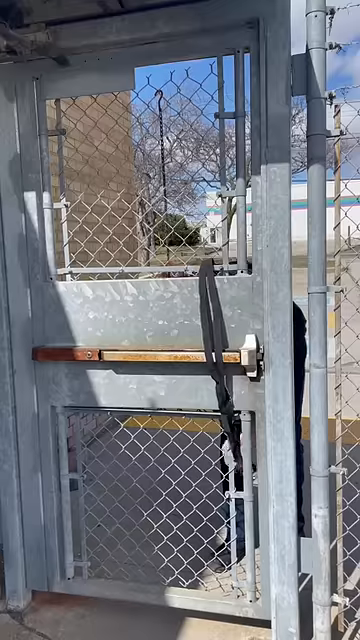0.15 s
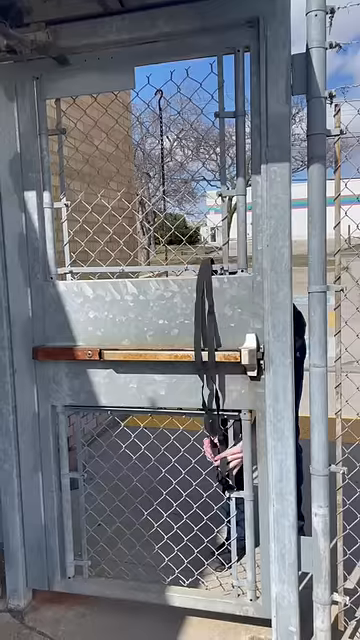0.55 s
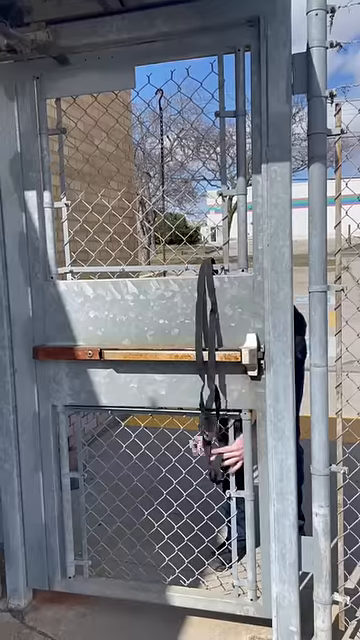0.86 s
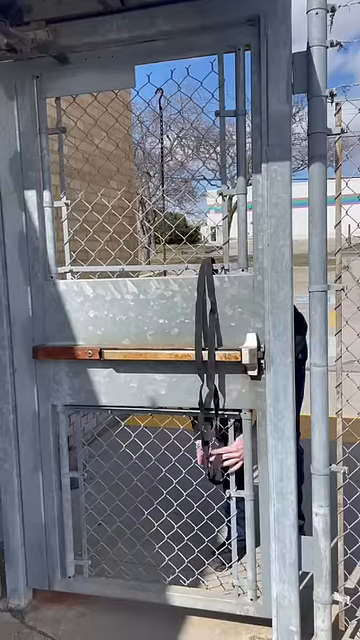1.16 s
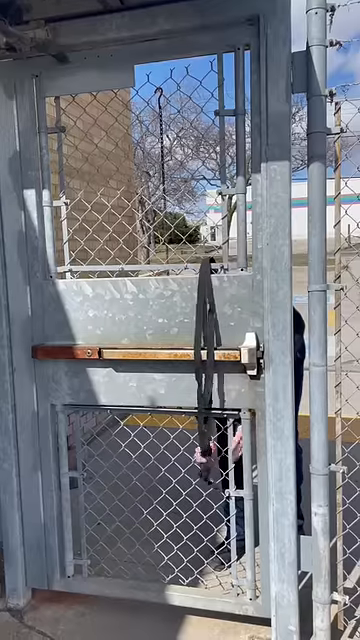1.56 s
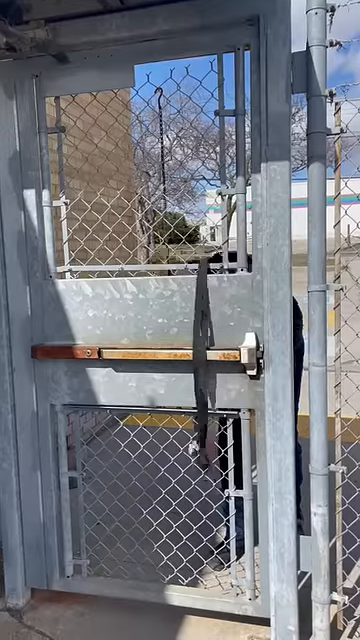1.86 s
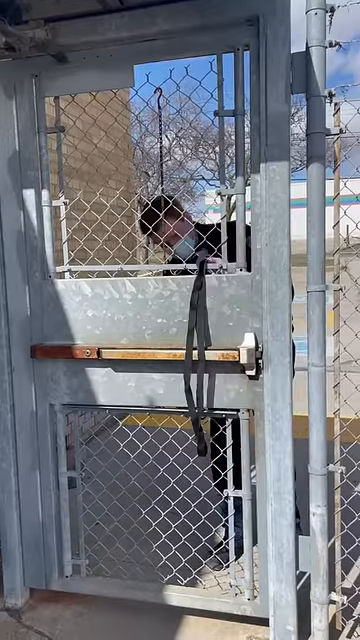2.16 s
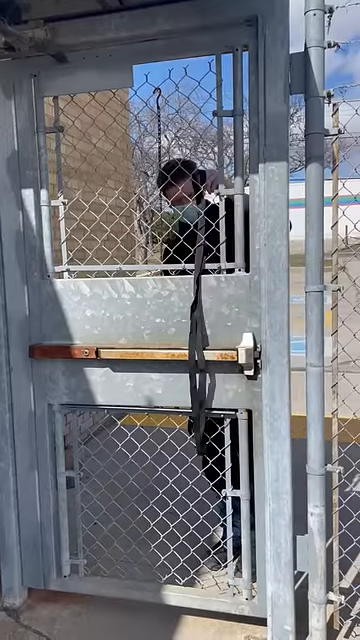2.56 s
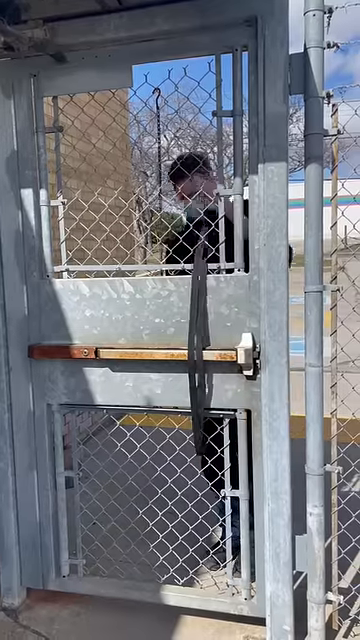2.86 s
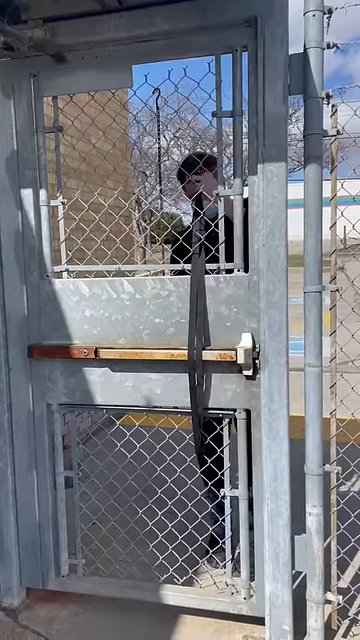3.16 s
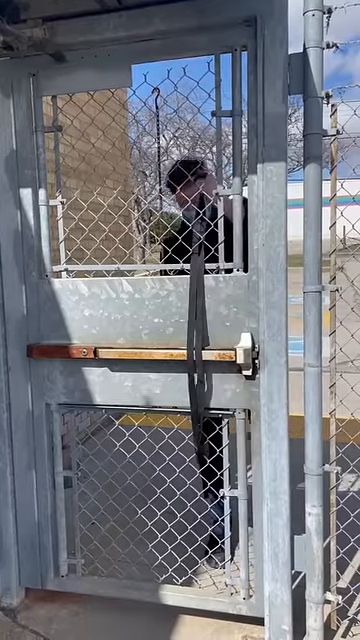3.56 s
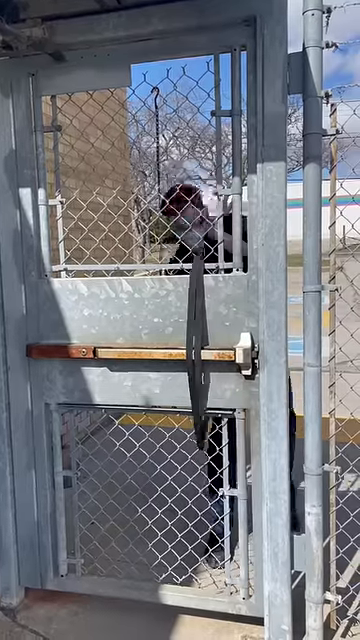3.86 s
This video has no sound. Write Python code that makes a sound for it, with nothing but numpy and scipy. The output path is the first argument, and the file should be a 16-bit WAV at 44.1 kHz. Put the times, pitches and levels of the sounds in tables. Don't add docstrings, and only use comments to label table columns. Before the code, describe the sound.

A strap rustles faintly on a steel mesh gate with small ticks and wire jingles, then the push bar knocks and the latch clanks and rattles. Outdoors, close stereo microphone buffeted by wind, far traffic hum.

```python
import sys
import numpy as np
from scipy import signal
from scipy.fft import rfft, irfft
from scipy.io import wavfile

SR = 44100
rng = np.random.default_rng(int(sys.argv[2]) if len(sys.argv) > 2 else 0)


def level_to_linear(level):
    exponent = np.asarray(level, float) / 20
    return 10 ** exponent


def pcm_store(signal):
    levels = np.round(np.clip(np.atleast_2d(signal), -1, 1) * 32767)
    wavfile.write(sys.argv[1], SR, levels.astype(np.int16).T)


N = 176400
BRIGHT_HZ = 4840


def rms_one(x):
    return x / np.sqrt(np.mean(x ** 2) + 1e-20)


def in_time(rows, off_db=-120):
    s, db, *rest = np.transpose(rows)
    t = np.arange(N) / SR
    outside = (t < s[0]) | (t > s[-1] + .004)
    level = np.where(outside, off_db, np.interp(t, s, db))
    return [level] + [np.interp(t, s, column) for column in rest]


def colour(x, points):
    below = (points[0][0] / 3, points[0][1] - 30)
    above = (points[-1][0] * 2, points[-1][1] - 40)
    hz, db = np.transpose([below] + list(points) + [above])
    f = np.arange(N // 2 + 1) * SR / N + 1
    return irfft(rfft(x) * level_to_linear(np.interp(np.log(f), np.log(hz), db)), N)


def cut(x, hz, kind, order=1):
    return signal.sosfilt(signal.butter(order, hz, kind, fs=SR, output="sos"), x)


def drift(rate_hz, rows=1):
    r = np.exp(-2 * np.pi * rate_hz / SR)
    noise = rng.standard_normal((rows, N + SR))
    return rms_one(signal.lfilter([1], [1, -2 * r, r * r], noise)[:, SR:])


def resonate(x, peaks):
    out = 0
    for k, (hz, width, db) in enumerate(peaks):
        r = np.exp(-np.pi * max(width, 5) / SR)
        poles = [1, -2 * r * np.cos(2 * np.pi * hz / SR), r * r]
        out = out + (-1) ** k * level_to_linear(db) * signal.lfilter([1 - r, 0, r - 1], poles, x)
    return out


def grains(per_s, spread):
    size = 10 ** (spread * np.minimum(rng.exponential(1, N), 4) / 20)
    size = size * rng.choice([-1, 1], N)
    return rms_one(size * (rng.random(N) < per_s / SR))


def patchy(x, depth_db):
    octave = np.log2(np.arange(N // 2 + 1) * SR / N / 30 + 1)
    spectrum = rfft(x)
    out = 0
    for k, waver in enumerate(drift(9, rows=11)):
        band = np.clip(1 - abs(octave - k), 0, 1)
        out = out + level_to_linear(depth_db * waver) * irfft(spectrum * band, N)
    return out


# (time [s], level [dB], brightness [dB])
RUB = [(0, -62, -4.5), (0.301, -70, 12.5), (.52, -61, -2), (.7, -65, -7), (.93, -70, -14), (.98, -55, -7.5),
       (1.14, -65, -27), (1.32, -75, 4.5), (1.37, -69, 10.5), (1.55, -56, 1), (1.72, -56.5, -2),
       (1.85, -50.5, -9), (2.1, -58, -15), (2.52, -55, -1), (2.8, -58, -6), (3.1, -55.5, -11),
       (3.2, -66, 1.5), (3.6, -62.5, 3)]
# (pitch [Hz], level [dB per Hz])
FIBRES = [(300, 14), (900, 5.5), (2600, 4), (4200, -1), (5100, 2.5), (7500, 1), (12000, -16.5),
          (15600, -15)]
# (pitch [Hz], width [Hz], level [dB])
MESH = [(2075, 90, 0), (2380, 90, -3), (3060, 90, -2), (3600, 100, -2)]
RUB_DB, RUB_PER_S, RUB_SPREAD, RUB_PATCH_DB = 4.5, 8000, 1, 2.2
MESH_DB, FLUTTER_DB, FLUTTER_HZ = -22, 1.6, 8


def strap():
    rub = grains(RUB_PER_S, RUB_SPREAD)
    level, bright = in_time(RUB + [(4.5, *RUB[-1][1:])])
    wires = 0
    for wire, waver in zip(MESH, drift(6, len(MESH))):
        wires = wires + level_to_linear(6 * waver) * resonate(rub, [wire])
    hiss = rms_one(patchy(colour(rub, FIBRES), RUB_PATCH_DB)) + level_to_linear(MESH_DB) * rms_one(wires)
    top = cut(hiss, BRIGHT_HZ, "high")
    top_gain = level_to_linear(bright + FLUTTER_DB * drift(FLUTTER_HZ)[0])
    return (hiss + (top_gain - 1) * top) * level_to_linear(level + RUB_DB)


# (time [s], peak [dB], pitch [Hz])
TICKS = [(0.174, -44, 900), (0.5077, -46.5, 716), (0.9492, -51, 960), (1.8128, -46, 1120),
         (2.0444, -50, 757), (2.6738, -38.5, 704), (2.7267, -41.5, 900), (3.0051, -47.5, 790),
         (3.0584, -40, 1320), (3.6311, -34.5, 710), (3.8307, -19, 780)]
TICK_CRACK_DB, TICK_RING_DB, TICK_ATTACK_S, TICK_T60_S = -3.5, -12.5, 0.00089, 0.11


def ticks():
    out, t = np.zeros(N + SR), np.arange(SR // 2) / SR
    crack = rms_one(colour(rng.standard_normal(N), FIBRES))
    shape = level_to_linear(-60 * t / TICK_T60_S) * (1 - np.exp(-t / TICK_ATTACK_S))
    for s, db, hz in TICKS:
        i = int(s * SR)
        ring = level_to_linear(TICK_RING_DB) * np.sin(2 * np.pi * hz * t)
        out[i:i + len(t)] += level_to_linear(db) * shape * (level_to_linear(TICK_CRACK_DB) * np.resize(crack[i:], len(t)) + ring)
    return out[:N]


# (time [s], peak [dB])
SNAPS = [(.08, -59), (.176, -41.5), (.3701, -58), (0.4213, -58), (.951, -58), (2.677, -39.5), (3.059, -34),
         (3.247, -54), (3.299, -53), (3.455, -46), (3.534, -53), (3.558, -53), (3.608, -45), (3.632, -46),
         (3.831, -16.5)]
SNAP_T60_S = .007


def snaps():
    out, t = np.zeros(N + SR), np.arange(SR // 2) / SR
    for s, db in SNAPS:
        i = int(s * SR)
        out[i:i + len(t)] += level_to_linear(np.maximum(db - 60 * t / SNAP_T60_S, -200)) * rng.standard_normal(len(t))
    return out[:N]


# (time [s], level [dB], time to die by 60 dB [s])
JINGLES = [
    (2.493, -45.5, 0.062),
    (2.76, -64, 0.12),
    (3.077, -39, 0.18),
    (3.46, -60, 0.1),
]
# (pitch [Hz], width [Hz, not used], level [dB])
WIRE = [(6830, 23, -4), (7600, 30, 2), (9370, 24, -10), (10470, 63, -13.5), (12300, 29, -29),
        (13100, 40, -15), (15500, 58, 7)]
JINGLE_ROUGH, JINGLE_HISS_DB, JINGLE_ATTACK_S = .7, -7, 0.0035


def jingles():
    out, t = np.zeros(N + SR), np.arange(SR // 2) / SR
    shake = drift(64, len(WIRE))
    hiss = np.diff(rng.standard_normal(N + 1))
    balance = rng.normal(0, 5.3, (len(JINGLES), len(WIRE)))
    for (s, db, t60), luck in zip(JINGLES, balance):
        now = slice(int(s * SR), int(s * SR) + len(t))
        shape = level_to_linear(db - 60 * t / t60) * (1 - np.exp(-t / JINGLE_ATTACK_S))
        sound = level_to_linear(JINGLE_HISS_DB) * hiss[now]
        for (hz, _, wire_db), extra_db, waver in zip(WIRE, luck, shake):
            rough = 1 + JINGLE_ROUGH * waver[now]
            sound = sound + level_to_linear(wire_db + extra_db) * rough * np.sin(2 * np.pi * hz * t)
        out[now] += shape * sound
    return out[:N]


# (pitch [Hz], level [dB per Hz])
STEEL = [(120, 3.5), (400, 8), (1000, 1), (2500, -2), (5200, -9), (7500, -11.5), (11000, -22), (16000, -29)]
KNOCKS_PER_S, KNOCK_SPREAD, RING_DB, SPLIT_HZ = 6000, 2.9, -2, 800


def steel(effort, peaks):
    level, heavy, bright = in_time(effort)
    knocks = grains(KNOCKS_PER_S, KNOCK_SPREAD)
    low = rms_one(cut(knocks, SPLIT_HZ, "low"))
    high = rms_one(cut(knocks, SPLIT_HZ, "high"))
    top = cut(high, BRIGHT_HZ, "high")
    ring_gain = level_to_linear(RING_DB) * np.std(colour(high, STEEL)) / np.std(resonate(high, peaks))

    def body(x):
        return colour(x, STEEL) + ring_gain * resonate(x, peaks)

    low_drive = level_to_linear(heavy) * low / np.std(body(low))
    high_drive = (high + (level_to_linear(bright) - 1) * top) / np.std(body(high))
    return body(level_to_linear(level) * (low_drive + high_drive))


# (time [s], level [dB], heaviness [dB], brightness [dB])
DRAG = [
    (3.628, -62, -1, 27),
    (3.634, -38, 4, -12),
    (3.664, -41, 7.5, -8),
    (3.684, -51.5, 17, 7),
    (3.76, -47.5, 11, 7.5),
    (3.79, -51, 8, 20),
    (3.822, -41.5, 3.5, -2),
]
# (pitch [Hz], width [Hz], level [dB])
BAR = [(330, 180, 0), (610, 130, 4), (900, 210, -8), (2150, 500, -0.5)]


def bar_drag():
    return steel(DRAG, BAR)


# (time [s], level [dB], heaviness [dB], brightness [dB])
CLANK = [
    (3.828, -35.5, 3, 5),
    (3.854, -16.5, -12, 3.5),
    (3.874, -20, -4.5, 2),
    (3.9, -27.5, -0.5, -11),
    (3.912, -21.5, -8.5, 9),
    (3.928, -24, 0.5, 1),
    (3.942, -22, -10, 12),
    (3.965, -24.5, -23, 1.5),
    (4, -31.5, 4.5, -12),
]
# (pitch [Hz], width [Hz], level [dB])
GATE = [(277, 110, 3.5), (500, 170, 1), (2030, 1900, -8), (3700, 740, 5), (5490, 1400, -3)]


def latch_clank():
    return steel(CLANK, GATE)


# (time [s], pitch [Hz], peak [dB], time to die by 60 dB [s])
RINGS = [(1.615, 3570, -51, 0.19), (1.805, 1160, -45.5, 0.13), (2.03, 4580, -64, 0.27),
         (2.15, 4580, -60, .3), (2.43, 5200, -61, .25), (2.45, 4580, -63, 0.24), (2.03, 4580, -62, 0.25),
         (2.15, 4580, -60, 0.25), (2.43, 5200, -64, 0.22), (2.45, 4580, -61, .3), (3.632, 2110, -37, 0.23),
         (3.634, 638, -27.5, 0.18), (3.655, 383, -35, 0.18), (3.64, 900, -36, .2), (3.632, 1142, -43, 0.14),
         (3.845, 290, -25, .25), (3.848, 471, -19, 0.14), (3.858, 531, -18, 0.16),
         (3.872, 259, -23.5, 0.22), (3.845, 1429, -26, .15), (3.845, 1800, -23, 0.17),
         (3.845, 2030, -25, 0.22), (3.847, 4130, -24, .15), (3.847, 5230, -39, .2), (3.884, 1200, -22, 0.2),
         (3.905, 6210, -20.5, 0.23), (3.91, 736, -25, 0.32), (3.93, 1330, -27.5, 0.66),
         (3.955, 1410, -34, .5), (3.932, 5330, -18.5, 0.145), (3.934, 4940, -21.5, 0.13),
         (3.94, 2070, -32, .25), (3.945, 3620, -18, 0.12), (3.935, 3170, -25, 0.13),
         (3.937, 4300, -31, 0.1), (3.935, 3170, -25, 0.11), (3.937, 4300, -32, .15), (3.94, 657, -26.5, .4)]
RING_RISE_S, RING_ROUGH, RING_WOBBLE_HZ = .004, .8, 70


def rings():
    out, t = np.zeros(N + SR), np.arange(SR // 2) / SR
    wobble = drift(RING_WOBBLE_HZ)[0]
    for k, (s, hz, db, t60) in enumerate(RINGS):
        i = int(s * SR)
        shape = level_to_linear(db - 60 * t / t60) * (1 - np.exp(-t / RING_RISE_S))
        rough = 1 + RING_ROUGH * wobble[k * 4000:][:len(t)]
        out[i:i + len(t)] += level_to_linear(-1.5) * shape * rough * np.sin(2 * np.pi * hz * t)
    return out[:N]


# (pitch [Hz], phase [radians])
LEAD = [(0, 0), (1720, 1.5), (3100, 1.7), (5000, .7), (7000, 2.9), (8600, 3.4), (9900, 6.0), (12300, 6.5),
        (13200, 9.3), (15100, 9.6), (15700, 11.2), (16500, 10)]
# (pitch [Hz], level [dB])
SCATTER = [(100, -20), (400, -13), (1300, -3), (2400, 0), (5000, -6), (6800, -18), (16000, -22)]
SCATTER_T60_S = .06


def ports(x):
    f = np.arange(N // 2 + 1) * SR / N
    turn = np.exp(.5j * np.interp(f, *np.transpose(LEAD)))
    fading = level_to_linear(np.maximum(-60 * np.arange(N) / SR / SCATTER_T60_S, -200))
    tail = rng.standard_normal((2, N)) * fading
    tail = .7 * tail - .3 * tail[::-1]
    hz, db = np.transpose(SCATTER)
    tail = tail / np.sqrt(2 * np.sum(tail[0] ** 2))
    spread = rfft(tail) * level_to_linear(np.interp(np.log(f + 1), np.log(hz), db))
    return irfft(rfft(x) * (np.array([turn, 1 / turn]) + spread), N)


# (start [s], length [s], level [dB])
GUSTS = [(0, 0.17, -38), (0.279, 0.15, -55), (0.822, 0.11, -37), (1.027, 0.17, -44), (1.232, 0.05, -44.5),
         (1.389, 0.13, -43), (1.563, 0.19, -39), (2.179, 0.06, -42), (2.667, 0.159, -48), (2.876, 0.2, -52),
         (3.268, 0.26, -48), (3.568, 0.49, -40)]
GUST_EDGE_S = .025


def gusts():
    t = np.arange(N) / SR
    power = 0
    for s, length, db in GUSTS:
        edge = np.minimum(t - s, s + length - t) / GUST_EDGE_S
        power = power + level_to_linear(2 * db) * np.clip(edge + .5, 0, 1) ** 2
    return np.sqrt(power)


# (time [s], peak [dB], pitch [Hz])
PUFFS = [(0.066, -24, 137), (0.127, -30, 95), (0.841, -23, 110), (0.893, -28, 60.5), (0.905, -20, 111),
         (1.06, -24.5, 113), (1.149, -24, 114), (1.178, -26, 133), (1.259, -29, 58), (1.411, -20, 92),
         (1.477, -26.5, 60), (1.661, -26, 101), (1.71, -27, 65.4), (1.752, -29, 62), (2.208, -35, 95),
         (2.24, -30, 52.5), (2.79, -31.5, 115), (2.816, -28.5, 153), (3.365, -26, 194)]
PUFF_DB, PUFF_CYCLES = -2, 1.24


def puffs():
    out, t = np.zeros(N), np.arange(N) / SR
    for (s, db, hz), turn in zip(PUFFS, rng.uniform(0, 2 * np.pi, len(PUFFS))):
        u = (t - s) * hz / PUFF_CYCLES - .5
        out += level_to_linear(db + PUFF_DB) * np.exp(-8 * u ** 2) * np.cos(2 * np.pi * hz * (t - s) + turn)
    return out


# (time [s], peak [dB])
SLAPS = [(0.037, -32), (0.067, -26.5), (0.13, -30.5), (0.139, -40.6), (0.182, -37), (0.842, -29.5),
         (0.859, -39), (0.871, -40.8), (0.884, -46), (0.898, -28), (0.91, -27.5), (0.92, -42),
         (1.098, -36.5), (1.137, -43), (1.148, -37), (1.178, -44), (1.418, -34), (1.427, -35), (1.474, -37),
         (1.589, -45), (1.601, -41.3), (1.625, -34.5), (1.659, -36), (1.666, -35.5), (1.675, -36),
         (1.686, -37), (1.71, -34.4), (1.717, -35), (1.958, -41), (2.202, -35.5), (2.722, -41.3),
         (2.817, -42), (3.074, -38), (3.376, -39.5)]
SLAP_DB, SLAP_HZ, SLAP_CYCLES = 2, 290, 1.35


def slaps():
    out, t = np.zeros(N), np.arange(N) / SR
    for s, db in SLAPS:
        u = (t - s) * SLAP_HZ / SLAP_CYCLES
        out -= level_to_linear(db + SLAP_DB) * np.exp(-8 * u ** 2) * np.cos(2 * np.pi * SLAP_HZ * (t - s))
    return out


# (pitch [Hz], level [dB per Hz])
WIND = [(30, -34), (55, 3.5), (115, -1.5), (300, -15), (700, -43.5)]
WIND_DB, LUMP_DB, LUMP_HZ, WIND_SIDE_DB, WIND_CUT_HZ = 3, 2, 25.8, -19, 45


def wind():
    lumpy = [rms_one(colour(rng.standard_normal(N), WIND)) * level_to_linear(LUMP_DB * g) for g in drift(LUMP_HZ, 2)]
    mid, side = rms_one(lumpy[0]), rms_one(lumpy[1])
    level = gusts() * level_to_linear(WIND_DB)
    mid = cut(mid * level + puffs() + slaps(), WIND_CUT_HZ, "high", order=2)
    return mid + level_to_linear(WIND_SIDE_DB) * level * side * np.array([[1], [-1]])


# (pitch [Hz], level [dB per Hz])
TRAFFIC = [(30, -1), (70, 9), (150, 2), (400, -9.5), (900, -10), (2000, -25.5), (5000, -45)]
TRAFFIC_DB, TRAFFIC_SIDE_DB, TRAFFIC_PATCH_DB = -50, -7, 1.1


def traffic():
    def hum():
        return rms_one(patchy(colour(rng.standard_normal(N), TRAFFIC), TRAFFIC_PATCH_DB))

    mid, side = hum(), hum()
    return level_to_linear(TRAFFIC_DB) * (mid + level_to_linear(TRAFFIC_SIDE_DB) * side * np.array([[1], [-1]]))


def scene():
    gate = strap() + ticks() + snaps() + jingles() + bar_drag() + latch_clank() + rings()
    fade = np.minimum(1, np.arange(N)[::-1] / 40)
    early = np.arange(N) < N // 2
    first = ports(gate * early)
    second = ports(gate * ~early * fade) * (np.arange(N) > N // 4)
    return first + second + wind() + traffic()


def top_cut(x):
    return signal.sosfilt(signal.butter(12, 16510, fs=SR, output="sos"), x)


def record(dry):
    mix = signal.sosfilt(signal.cheby2(12, 70, 16500, fs=SR, output="sos"), dry)
    return top_cut(mix)


dry = scene()
out = record(dry)
pcm_store(out)
```